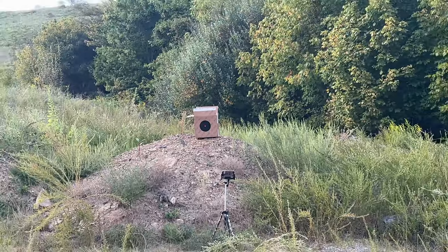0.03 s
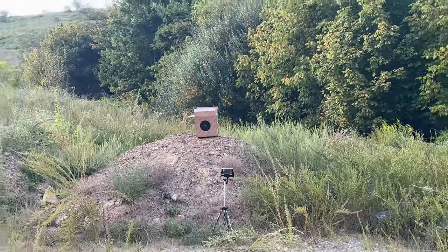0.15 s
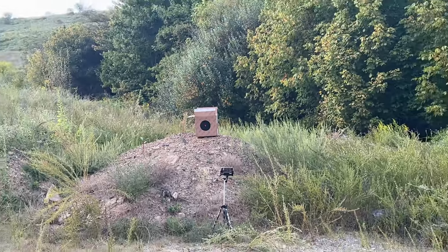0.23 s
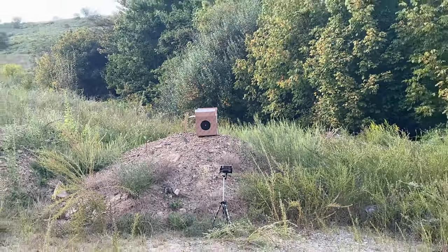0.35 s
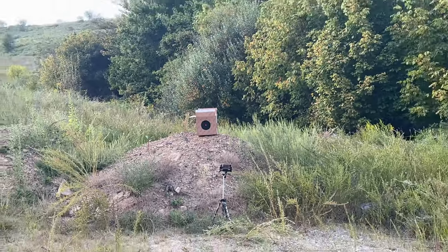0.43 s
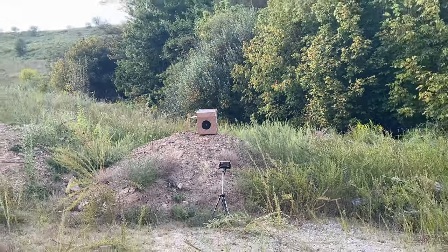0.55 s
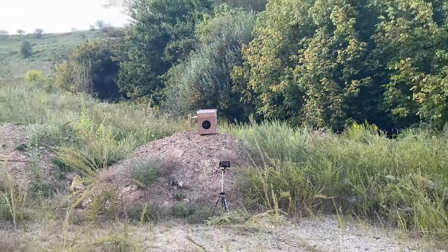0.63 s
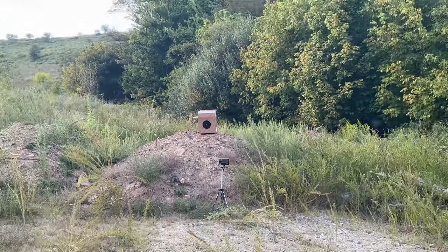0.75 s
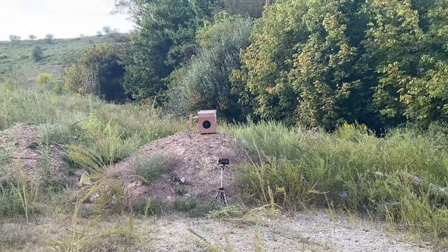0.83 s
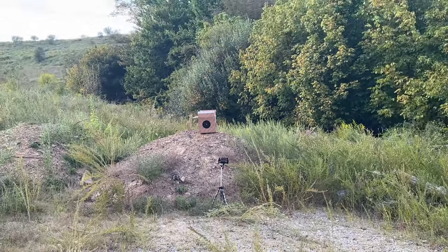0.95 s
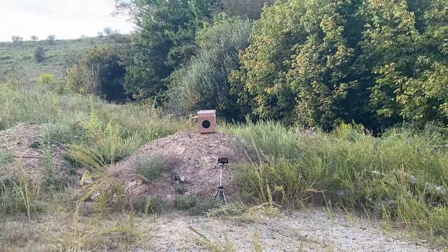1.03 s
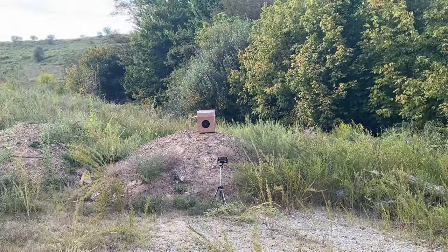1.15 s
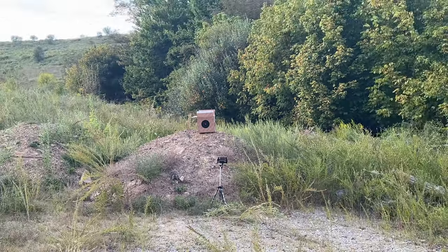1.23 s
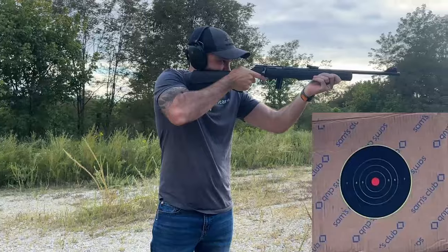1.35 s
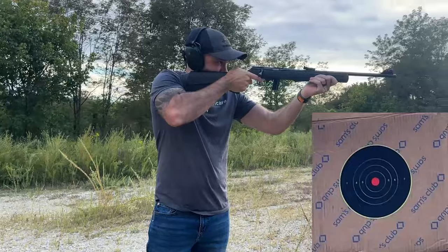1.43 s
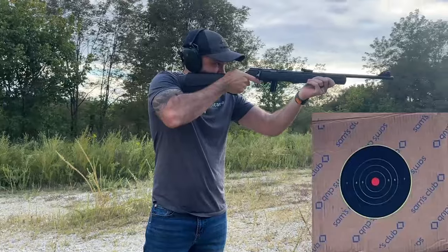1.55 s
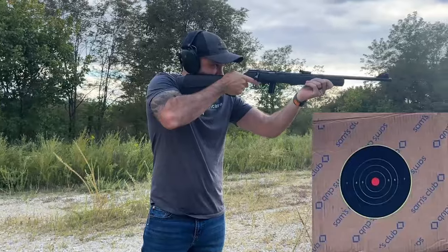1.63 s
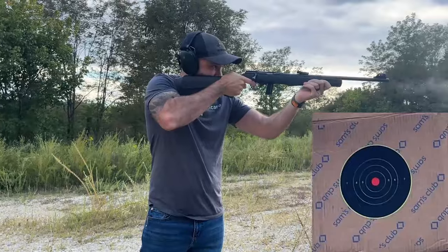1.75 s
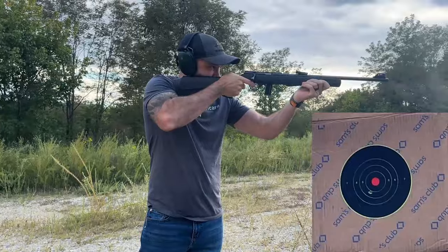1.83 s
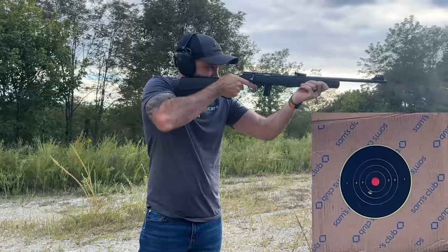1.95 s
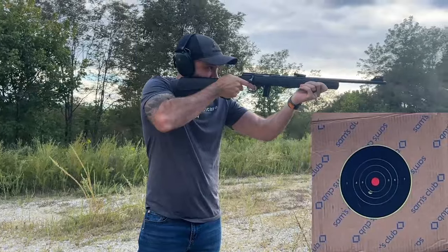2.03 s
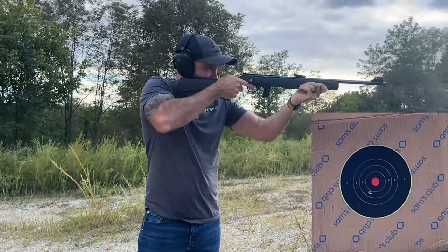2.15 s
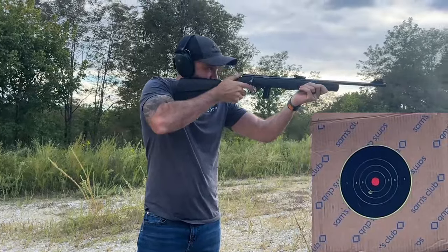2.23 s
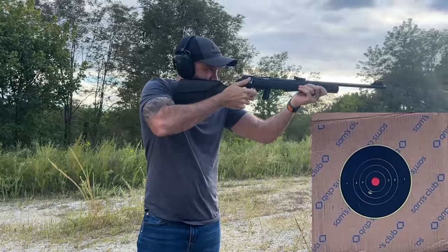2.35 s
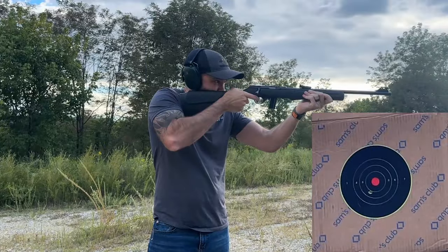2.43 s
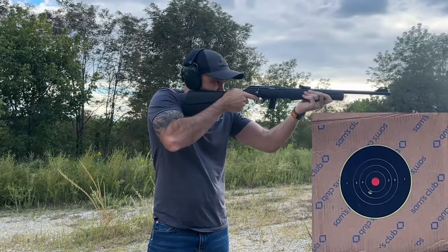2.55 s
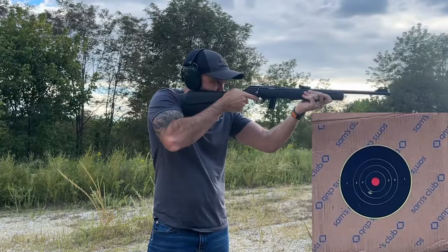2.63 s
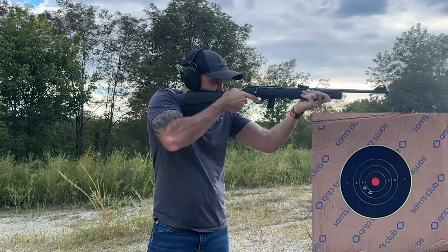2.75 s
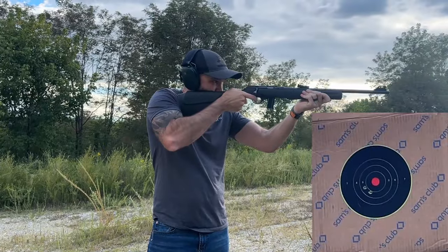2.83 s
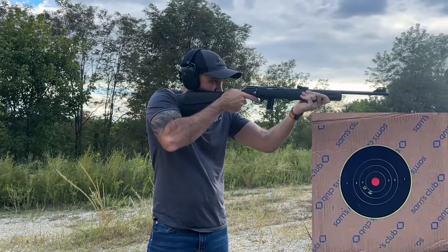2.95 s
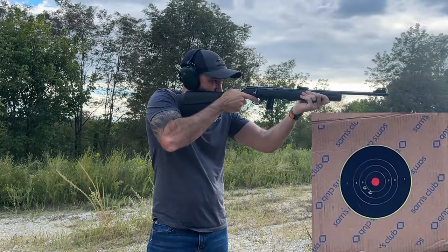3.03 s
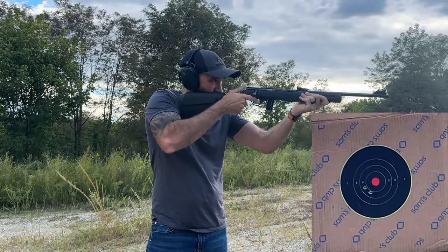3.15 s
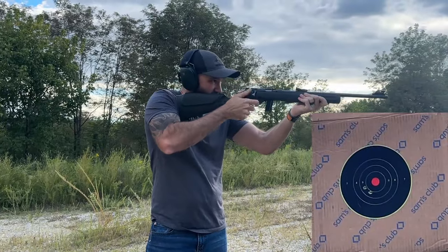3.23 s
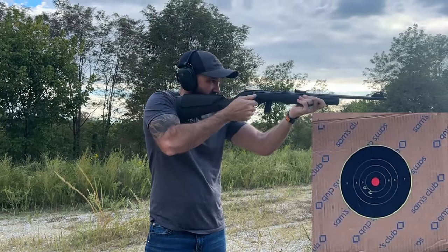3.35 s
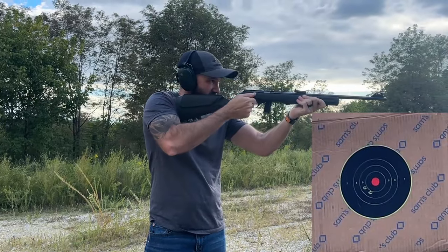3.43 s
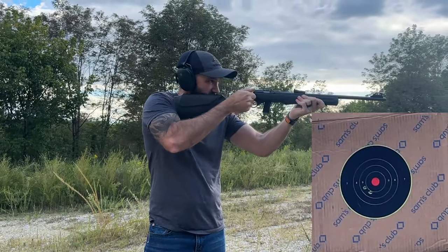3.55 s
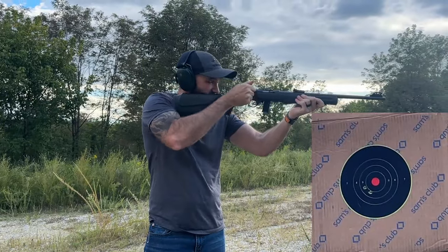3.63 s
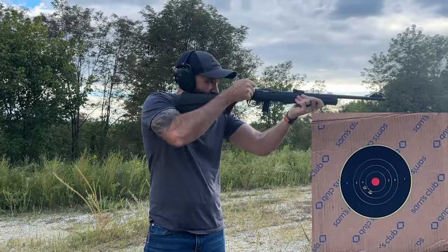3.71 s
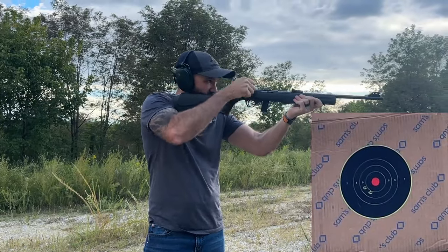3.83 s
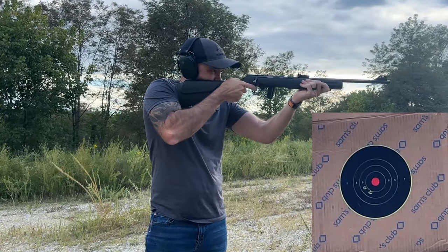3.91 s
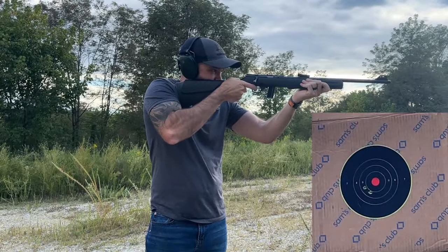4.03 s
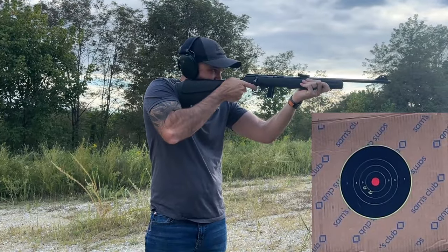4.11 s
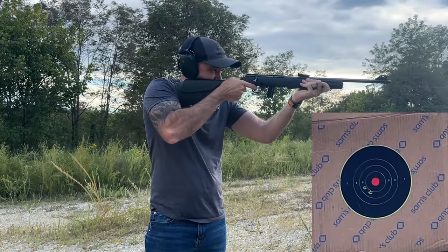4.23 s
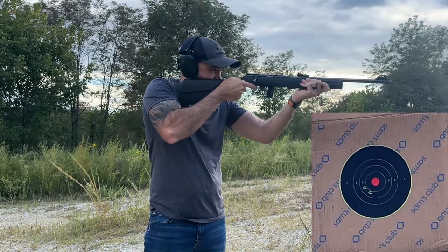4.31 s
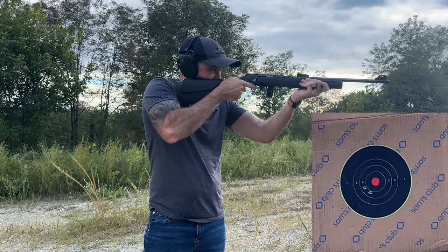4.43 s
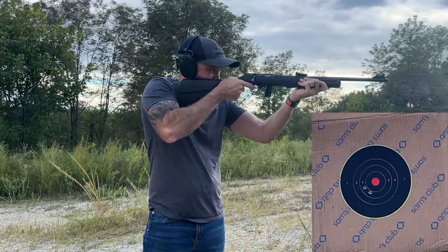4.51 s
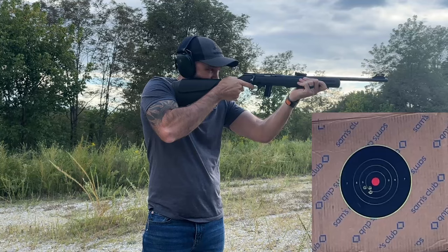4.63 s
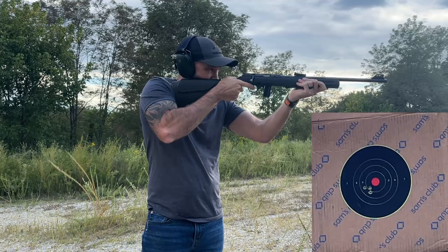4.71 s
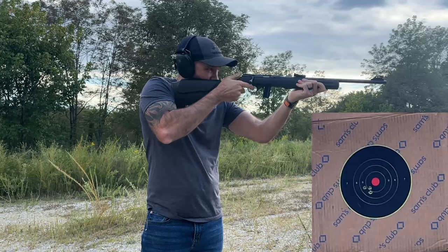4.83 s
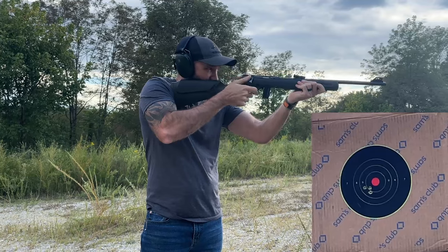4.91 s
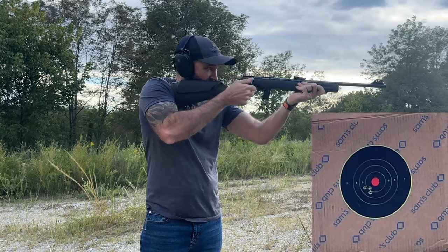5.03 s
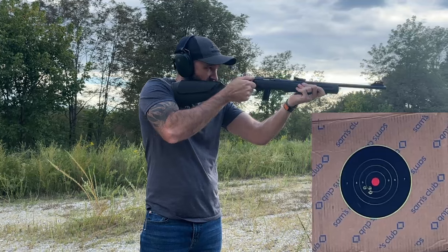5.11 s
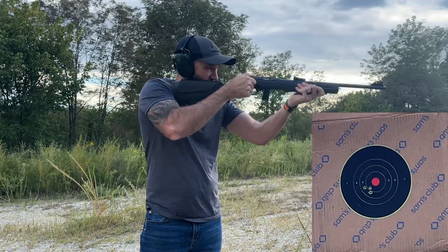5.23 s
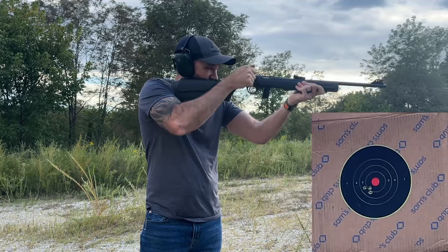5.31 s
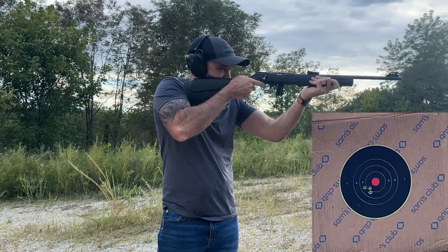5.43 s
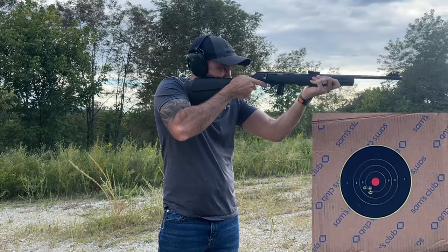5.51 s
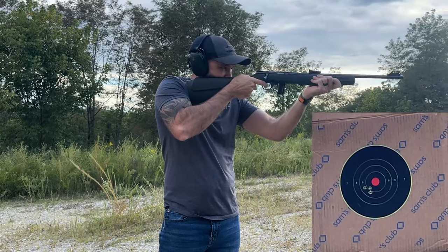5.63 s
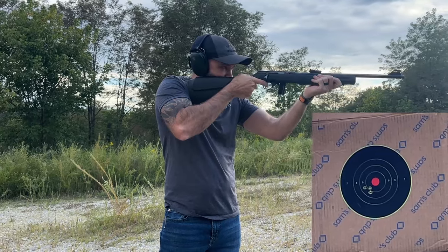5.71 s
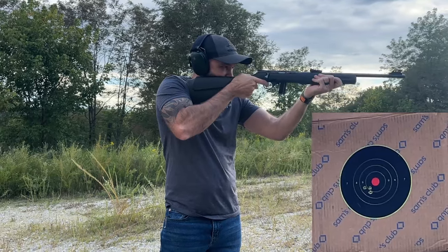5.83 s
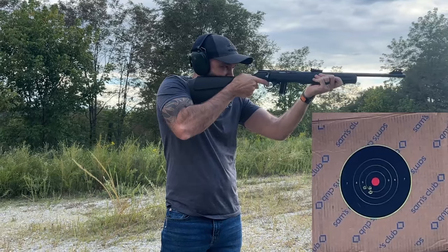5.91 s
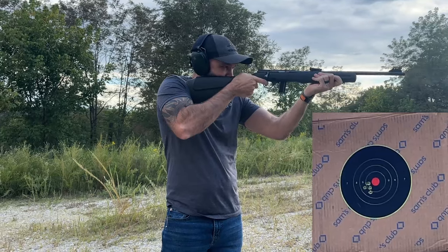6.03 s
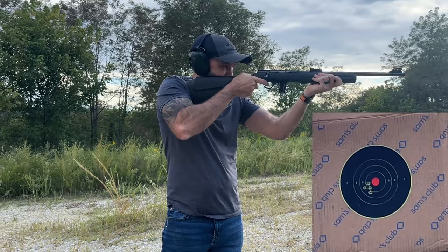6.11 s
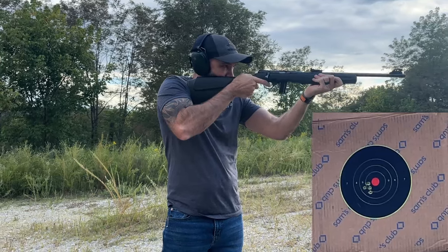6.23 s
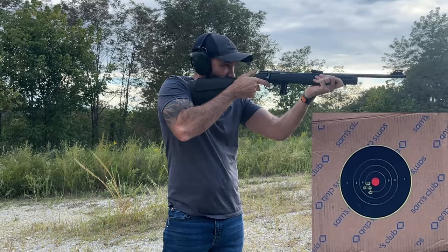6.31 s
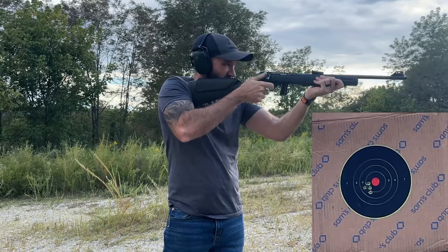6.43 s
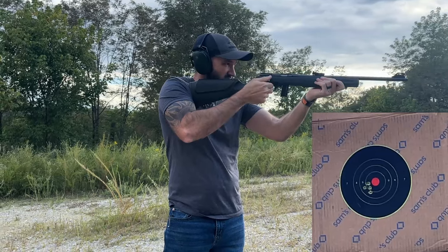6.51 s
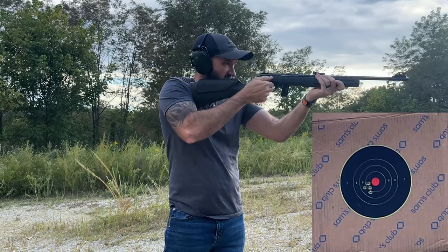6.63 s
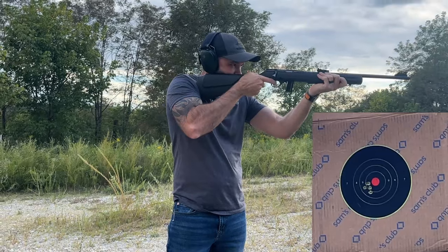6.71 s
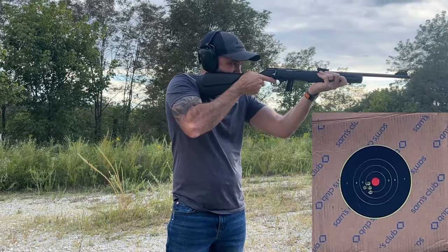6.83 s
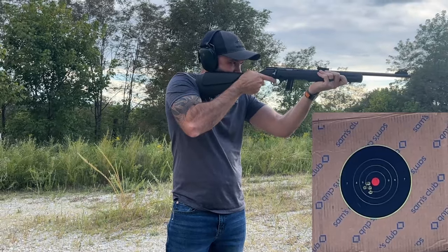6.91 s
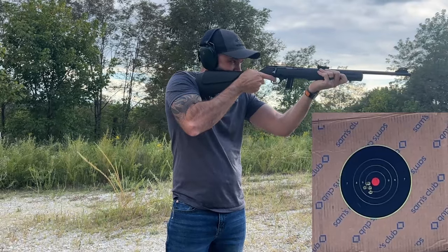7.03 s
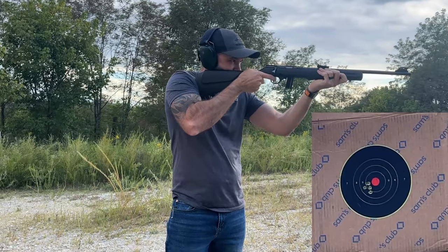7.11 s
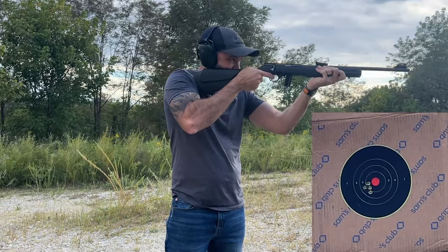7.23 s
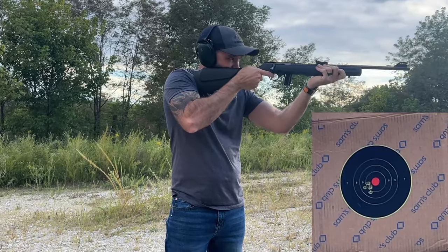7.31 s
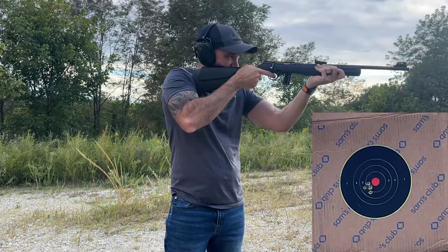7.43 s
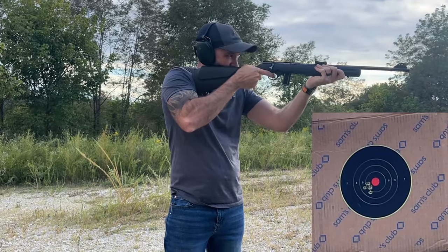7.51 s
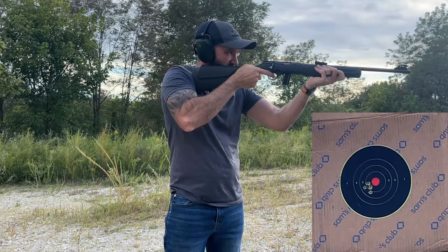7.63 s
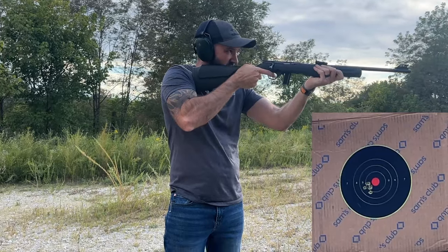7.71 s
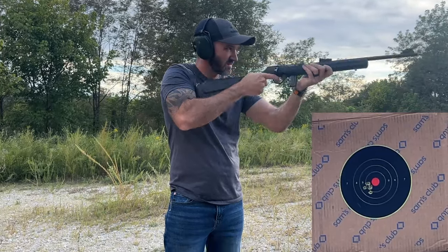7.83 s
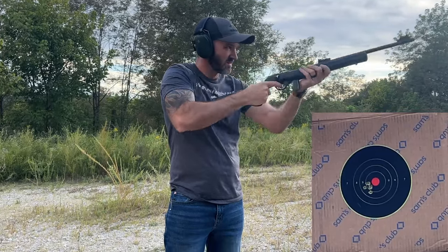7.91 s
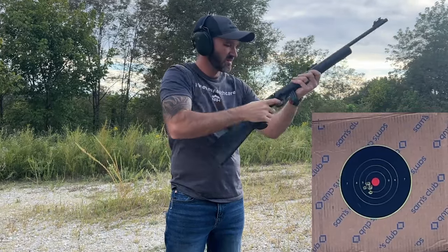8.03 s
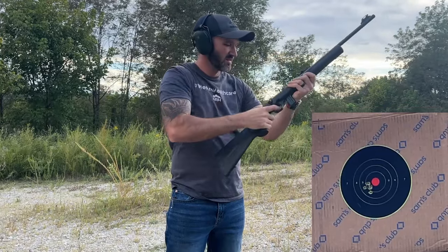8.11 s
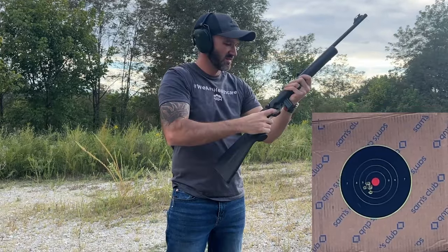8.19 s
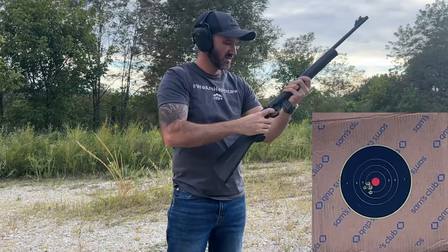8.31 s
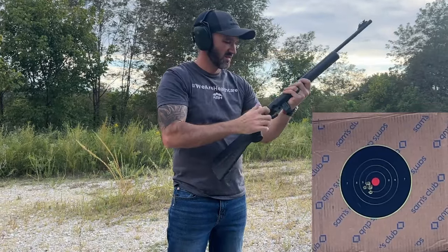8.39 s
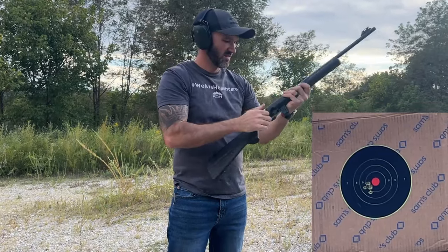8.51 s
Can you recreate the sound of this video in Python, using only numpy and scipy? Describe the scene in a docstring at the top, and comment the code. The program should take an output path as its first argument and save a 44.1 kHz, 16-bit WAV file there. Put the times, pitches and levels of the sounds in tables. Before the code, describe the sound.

A quiet field with thin throbbing cicadas, soft air and low rumble; a faint bolt click. Then five small-rifle shots crack close by, one to two seconds apart, each with a low thump of air on the microphones and a grainy echo from banks and trees fading fast. Short steely bolt clicks fall between some shots. The stereo phone microphones overload softly, and the background shifts abruptly at splices.

```python
"""Cicadas buzz over a low rumble and a bolt clicks; then five small-rifle shots crack in a field, close by.
Each shot is a smear of noise, a sharp front and a noise burst; the same banks and tree lines return it as
duller bursts and fading, grainy noise. Low falling sweeps are puffs of air on a phone's two microphones,
filtered noise is the air they stir, and two close tones beating are a shaking stand. Bolt clicks are short
rattles that ring steel. The waits are spliced short, which stops tails; the background changes in steps."""
import sys
import numpy as np
from scipy import signal
from scipy.fft import rfft, irfft, next_fast_len
from scipy.io import wavfile
from scipy.ndimage import uniform_filter1d

SR = 44100
rng = np.random.default_rng(int(sys.argv[2]) if len(sys.argv) > 2 else 0)


def ratio(d):
    """dB to gain"""
    e = np.asarray(d, float) / 20
    return 10 ** e


def int16_out(signal):
    """Quantize to a 16-bit WAV file."""
    q = np.round(np.clip(np.atleast_2d(signal).T, -1, 1) * 32767)
    wavfile.write(sys.argv[1], SR, q.astype(np.int16))


N = 377527  # length in samples


def evened(x):
    """Scales a sound to rms 1."""
    return x / np.sqrt(np.mean(x ** 2) + 1e-20)


def read(points, hz):
    """Reads a curve of (Hz, value) points along a log frequency axis."""
    f, value = np.transpose(points)
    return np.interp(np.log(hz + 1), np.log(f + 1), value)


def add(mix, s, sound):
    """Mixes a sound in at s seconds."""
    part = mix[..., round(s * SR):][..., :sound.shape[-1]]
    part += sound[..., :part.shape[-1]]


def colour(x, points):
    """Filters by a spectrum of (Hz, dB) points; nothing passes far beyond its ends."""
    size = next_fast_len(x.shape[-1])
    hz = np.fft.rfftfreq(size, 1 / SR)
    inside = (hz > points[0][0] / 2) & (hz < points[-1][0] * 1.03)
    return irfft(rfft(x, size) * ratio(read(points, hz)) * inside, size)[..., :x.shape[-1]]


def bandpass(x, order, low_hz, high_hz):
    """Lets one band of frequencies through."""
    return signal.sosfilt(signal.butter(order, [low_hz, high_hz], "bandpass", fs=SR, output="sos"), x)


def pair(shape, same):
    """Two noise channels; same is how alike they are, 0 for unrelated and 1 for equal."""
    a, b = rng.standard_normal((2, *shape))
    same = np.clip(same, -1, 1)
    return np.array([a, same * a + np.sqrt(1 - same ** 2) * b])


# Colour of the blast. Each row: frequency in Hz, relative level in dB.
BLAST_COLOUR = [(150, -35.5), (400, 10.5), (800, 10.5), (2000, -0.5), (4500, -2.5), (8000, -8),
                (11000, -11.5), (15000, -4.5), (16500, -16)]


def blast():
    """A thin sharp front, then a few ms of cracking gas; 256 samples of silence ahead."""
    t = np.maximum(np.arange(-256, 768) / SR, 0)
    u = t * SR / 2.5  # the front lasts about two samples
    front = 4.0 * (1 - u) * np.exp(-u)
    gas = pair((1024,), 0.35) * u / 12 * np.exp(1 - u / 12)
    sound = colour((front + gas) * (t > 0), BLAST_COLOUR)
    energy = (sound ** 2).sum(1).mean()
    return sound / np.sqrt(energy / (0.0048 * SR))  # rms 1 if packed into 4.8 ms


# What scatters the shot back, nearest first.
# Each row: delay in seconds, relative level in dB, swell before it in dB per s, fade after it in dB per s.
REFLECTORS = [(0.001, -17.5, 895, 844.5), (0.04, -14, 494, 904), (0.102, -22, 350, 211),
              (.15, -34.5, 100, 77), (.3, -24, 112.5, 65.5), (.55, -39, 59.5, 25.5)]
# Colour of the returning sound. Each row: frequency in Hz, relative level in dB.
RETURN_COLOUR = [(200, -40.5), (450, -6), (1000, 3), (2000, -0.5), (3000, -1.5), (5000, -5.5), (8000, -15),
                 (11000, -16.5), (15500, -23.5)]
# Further loss with distance. Each row: frequency in Hz, loss in dB per s of delay.
DISTANCE_LOSS = [(300, 44), (600, 26.5), (1000, 1.5), (1800, -1.5), (3500, 9), (6000, 24.5), (10000, 30),
                 (15000, 56.5)]


def scatter(seconds, tilt_db):
    """Countless returns from grass and trees: grainy noise, changing colour with distance, a swell each reflector."""
    hz = np.fft.rfftfreq(256, 1 / SR)
    frames = int(seconds * SR / 64) + 4
    t = np.arange(frames)[:, None] * 64 / SR
    grains = pair((frames, 129), 0.49) + 1j * pair((frames, 129), 0.48)

    # random level spread: ripples across frequency, and slower lumps across time and frequency
    ripples = uniform_filter1d(rng.standard_normal((frames, 129)), size=20, axis=1)
    ripples_db = 2.6 * evened(ripples) * np.exp(-t / 3.3)
    lumps = uniform_filter1d(rng.standard_normal((frames, 129)), size=14, axis=0)
    lumps_db = 1.6 * evened(uniform_filter1d(lumps, size=8, axis=1))

    shape_db = read(RETURN_COLOUR, hz) + tilt_db * np.log2((hz + 1) / 2000)  # tilt in dB per octave
    level_db = shape_db - t * read(DISTANCE_LOSS, hz) + ripples_db + lumps_db
    grains *= ratio(level_db) * (hz < 16200) / np.sqrt(np.mean(ratio(2 * shape_db)))
    sound = signal.istft(grains.transpose(0, 2, 1), nperseg=256, noverlap=192)[1]
    sound = sound[:, :round(seconds * SR)] / 10

    t = np.arange(sound.shape[1]) / SR
    power = 0
    for s, db, swell, fade in REFLECTORS:
        power = power + ratio(2 * (db - np.maximum(swell * (s - t), fade * (t - s))))
    return sound * np.sqrt(power)


SMEAR_S = 0.019  # length of the smear


def smear(hz):
    """A short smear of noise around hz that swells, and a dull low body under it, alike in both channels."""
    u = np.linspace(0, 1, round(SMEAR_S * SR))
    swell = np.sin(np.pi * .8 * u ** 1.8) ** 2
    hiss = bandpass(pair(u.shape, 0.4), 1, hz / 2, hz * 2)
    hiss = signal.sosfilt(signal.butter(4, 7000, fs=SR, output="sos"), hiss)
    dull_body = 900 / hz * evened(bandpass(rng.standard_normal(u.shape), 2, 380, 850))
    return swell * evened(hiss), swell * dull_body


# The shots. Each row: time in seconds, blast level in dB, level of its scattered echo in dB,
# level of the smear of noise just ahead of it in dB, centre of the smear's colour in Hz
# (a higher one also brightens the echo).
SHOTS = [(1.7487, -18.5, -8, -18.5, 900), (2.7288, -15, -12, -18.5, 616), (4.4882, -12, -8, -18, 1000),
         (5.965, -15.5, -15.5, -22.5, 2500), (7.2184, -15.5, -7, -20, 1100)]
# The blast and its near returns. Each row: delay in seconds, level against the blast in dB, dullness 0-1.
NEAR_RETURNS = [(0, 0, 0.17), (.0048, -10, .6), (0.0395, 4, .55), (0.0448, -11, 0.5)]
# Single trunks of the two tree lines: a list of delays in seconds.
TRUNKS = [.09, .1, .108, .126, .135, .148, .18, .2254, .2485, .2596, .2686, .28, .2914, .32, .3557]
# Where the background changes level, at a splice or otherwise: a list of times in seconds.
BACKGROUND_STEPS = [0, .36, 1.305, 2.43, 3.91, 4.6, 5.47, 6.748, 7.9]
TILT_DB, TILT_DB_PER_OCTAVE = 1.48, 1.04  # echo tilt in dB per octave; its growth per octave of smear colour
TRUNK_DB, TRUNK_SPREAD_DB = -17, 2.5  # level of a trunk's return against the scatter; its random spread
TRUNK_DB_PER_S, TRUNK_DULL = -18, 0.98  # level change with delay; dullness 0-1
LEFT_LAG = 19  # samples; the sound reaches the right microphone first


def shots():
    """The blast with a smear of noise just ahead, single echoes, and a scattered tail that is cut off."""
    out, body = np.zeros((2, N)), np.zeros(N)
    for s, db, scatter_db, smear_db, hz in SHOTS:
        # the tail stops at a step over half a second later, never the last step, or else at the end
        cut = min([c for c in BACKGROUND_STEPS[:-1] if c > s + .5] + [N / SR])
        tilt_db = TILT_DB + TILT_DB_PER_OCTAVE * np.log2(hz / 1000)
        add(out, s, ratio(scatter_db) * scatter(cut - s, tilt_db))

        returns = [(delay, db + echo_db, dull) for delay, echo_db, dull in NEAR_RETURNS]
        for delay in TRUNKS:
            spread_db = TRUNK_SPREAD_DB * rng.standard_normal()
            trunk_db = scatter_db + TRUNK_DB + TRUNK_DB_PER_S * delay + spread_db
            returns.append((delay, trunk_db, TRUNK_DULL))
        for delay, return_db, dull in returns:
            crack = blast()
            crack = crack + np.clip(dull, 0, 1) * (bandpass(crack, 2, 1050, 3300) - crack)
            add(out, s + delay - 256 / SR, ratio(return_db) * crack)

        hiss, dull_body = smear(hz)
        add(out, s - SMEAR_S, ratio(smear_db) * hiss)
        add(body, s - SMEAR_S, ratio(smear_db) * dull_body)
    out[0] = np.roll(out[0], LEFT_LAG)
    return out + body


# Puffs of air on the microphones.
# Each row: start in seconds, level in dB, seconds to the peak, relative level of the mid-range knock in dB.
PUFFS = [(1.751, -12, 0.018, -28), (1.787, -14.5, 0.019, -36), (1.863, -24.5, 0.027, -72.5),
         (1.947, -26.5, 0.02, -53.5), (2.013, -19.5, .018, -36.5), (2.043, -23.5, 0.015, -46),
         (2.11, -35, 0.026, -89), (2.713, -13.5, 0.032, -25.5), (2.728, -11.5, 0.013, -41),
         (2.765, -14.5, 0.013, -43.5), (2.791, -17, 0.031, -44.5), (2.878, -28, 0.024, -55.5),
         (4.483, -12.5, 0.018, -30), (4.524, -9.5, 0.015, -29), (4.651, -32.5, 0.016, -55),
         (5.947, -17, 0.036, -52), (5.965, -10.5, 0.017, -52), (6.06, -32.5, 0.035, -71),
         (6.106, -22.5, 0.018, -46), (7.222, -8, 0.019, -33.5), (7.263, -32.5, 0.0085, -41.5),
         (7.284, -21, 0.023, -72), (7.419, -21.5, 0.017, -48)]
SWEEP_HZ, SHARP_S = 167.5, .016  # height of the sweep for a puff peaking after SHARP_S; slower puffs sweep less


def thumps():
    """Each puff leaves the steep bass filter as a falling sweep, led by a short knock; it meets the ports unevenly."""
    out, t = np.zeros((2, N)), np.arange(round(.2 * SR)) / SR
    for (s, db, rise, knock_db), skew in zip(PUFFS, rng.choice([-1., 1.], len(PUFFS))):
        sweep_hz = SWEEP_HZ * (SHARP_S / rise) ** 0.66
        turns = 47 * t + sweep_hz * .013 * (1 - np.exp(-t / .013))  # falls towards 47 Hz
        uneven = skew * np.array([[1], [-1]]) * 0.38 * np.exp(-25 * t)  # phase in radians
        puff = (t / rise * np.exp(1 - t / rise)) ** 2
        add(out, s, ratio(db) * puff * np.cos(2 * np.pi * turns + 0.52 + uneven))
        tap = (t / 0.0037 * np.exp(1 - t / 0.0059)) ** 2
        knock = np.sin(2 * np.pi * (420 * t - 4000 * t ** 2) + uneven)  # falls from 420 Hz
        add(out, s, ratio(knock_db) * tap * knock)
    return out


# Stirred air after a shot. Each row: frequency in Hz, relative level in dB.
BUFFET_COLOUR = [(45, -11.5), (70, -0.5), (110, -3), (160, -11.5), (210, -31.5)]
BUFFET_DB, BUFFET_DB_PER_S = -35, 94  # level at the start, fade


def buffet():
    """The air round the microphones rumbles unevenly for a moment after each shot."""
    out, t = np.zeros((2, N)), np.arange(round(.6 * SR)) / SR
    for s, *_ in SHOTS:
        fade = ratio(BUFFET_DB - BUFFET_DB_PER_S * t) * np.minimum(t / .01, 1)
        add(out, s, fade * evened(colour(pair(t.shape, 0.59), BUFFET_COLOUR)))
    return out


# The stand keeps swaying.
# Each row: start in seconds, level in dB before the beat, middle pitch in Hz, seconds between lulls, fade in dB per s.
STAND_SWINGS = [(1.82, -24.5, 54.45, 0.18, 73.5), (2.77, -27, 46.2, 0.17, 72), (5.96, -23, 49.2, .195, 60),
                (7.281, -19.5, 48.86, .197, 85.5)]
SWAY_BEAT, SWAY_S = 0.56, 1  # depth of the beating 0-1, length in seconds


def sway():
    """A low near-sine that dies in steps, as two close swings of the stand beat."""
    out, t = np.zeros(N), np.arange(round(SWAY_S * SR)) / SR
    ends = signal.windows.tukey(len(t), .05)  # soft start and end
    for s, db, hz, lull_s, fade in STAND_SWINGS:
        upper = np.cos(2 * np.pi * (hz + 1 / (2 * lull_s)) * t)
        lower = np.cos(2 * np.pi * (hz - 1 / (2 * lull_s)) * t)
        add(out, s, ratio(db - fade * t) * (upper - SWAY_BEAT * lower) * ends)
    return out


# Blows of the bolt. Each row: time in seconds, peak level of the body in dB, treble over body in dB,
# left over right in dB, pitch of the ring as a factor on the modes.
BOLT_CLICKS = [(0.643, -43, -30, 7, 1.5), (0.822, -57, -16, -2, 0.74), (3.283, -46.5, -27, 7, 1.6),
               (3.484, -54.5, -2.5, 5, .99), (3.668, -23, -6.5, 0.2, 1.13), (5.131, -34.5, -4, 3, 1.2),
               (5.324, -21, -9.5, -1.5, 1.046), (6.682, -45.5, -1.5, 0.5, 1.5), (6.949, -61, -27, 0, 0.84),
               (7.109, -64, -18.5, 14, 1.07), (7.142, -54.5, -30, 13, 1.03), (8.101, -57, -21, 5, 1.3)]
# Ringing modes of the steel. Each row: frequency in Hz at pitch 1, relative level in dB, seconds to fade by 60 dB.
STEEL_MODES = [(430, -40.5, 0.0105), (970, -15.5, 0.0095), (1527, 8, 0.025), (2000, 1, 0.0088),
               (2645, 10.5, 0.023), (4330, -2.5, 0.022), (4870, 12.5, 0.004)]
# Dry blow on the stock. Each row: frequency in Hz at pitch 1, relative level in dB.
CLACK_COLOUR = [(250, -35), (450, 11), (1200, -2.5), (3000, -7), (6000, -10.5), (9000, -28)]
CLACK_DB = -0.5  # level of the dry blow against the ring
RATTLE_S, RATTLE_SHARE = .0028, .35  # decay time for a -22 dB blow; share of the dB above or below that it follows


def bolt():
    """Steel parts meet in a quick rattle of ticks that briefly rings the action."""
    out, t = np.zeros((2, N)), np.arange(1300) / SR
    contact = 12  # samples
    for s, db, treble_db, pan_db, pitch in BOLT_CLICKS:
        # each mode is detuned at random, up to 4 percent, for every click
        factors = pitch * rng.uniform(0.96, 1.04, len(STEEL_MODES))
        ring = np.zeros(len(t))
        for (hz, level_db, t60), factor in zip(STEEL_MODES, factors):
            ring += ratio(level_db - 60 * t / t60) * np.sin(2 * np.pi * hz * factor * t)
        ring[:contact] += 13.0 * np.gradient(signal.windows.hann(contact))  # the blow itself

        decay_s = RATTLE_S * ratio(RATTLE_SHARE * (db + 22))
        rattle = pair(t.shape, 0.87) ** 3 * t ** 1.4 * np.exp(-t / decay_s)
        body = signal.fftconvolve(rattle, ring[None], axes=1)[:, :len(t)]
        # small parts clack much higher
        clack = colour(rattle, [(hz * pitch ** 3, level_db) for hz, level_db in CLACK_COLOUR])
        body += ratio(CLACK_DB) * clack * np.linalg.norm(body) / np.linalg.norm(clack)
        ticks = bandpass(rattle, 4, 8000, 16000)
        treble = ratio(treble_db) * ticks * np.linalg.norm(body) / np.linalg.norm(ticks)
        click = (body + treble) / abs(body).max()
        sides_db = np.array([[.5], [-.5]]) * pan_db
        add(out, s - .002, ratio(db + sides_db) * click)
    return out


# Background levels, one row for each stretch between the times in BACKGROUND_STEPS. Each row: rumble in dB,
# 90 Hz hum in dB, cicadas in dB before they throb, rustle in dB before its gusts, high insects in dB.
STRETCHES = [(-65.5, -85, -72.5, -85, -72.5), (-65.5, -76, -73, -78, -74), (-70, -76, -67, -100, -78.5),
             (-73.5, -74.5, -70, -94, -100), (-65, -62, -67.5, -100, -100), (-70, -70, -67.5, -83.5, -100),
             (-69.5, -81.5, -70, -100, -100), (-70, -95, -69.5, -100, -100), (-71.5, -80, -71, -102, -100)]
# Colours of the six layers. Each row of each: frequency in Hz, relative level in dB.
RUMBLE_COLOUR = [(22, -52.5), (35, -20), (50, -4.5), (75, 5.5), (120, -4), (170, -10.5), (230, -29),
                 (300, -31.5)]
HUM_COLOUR = [(75, -21.5), (90, -3.5), (105, -24.5)]
CICADA_COLOUR = [(3400, -33), (3650, -4), (3800, -8), (3950, -3), (4250, -31)]
AIR_COLOUR = [(200, -7), (500, -5), (1000, -5), (2200, -26.5), (4800, -6.5), (5600, -2.5), (6300, 0),
              (7700, 1), (8600, -8), (9200, -27.5), (11500, -37), (14500, -6.5), (16000, -12)]
RUSTLE_COLOUR = [(900, -11), (1300, -5.5), (1900, -7.5), (2800, -14.5), (3300, -22)]
HIGH_INSECT_COLOUR = [(5180, -31.5), (8800, -9.5), (9820, 9), (10700, -4), (12100, -8.5), (13200, 2),
                      (15200, -19.5), (16000, -13)]
AIR_DB = -70  # steady level of the soft air
THROB_HZ, THROB_DEPTH = 68.2, .5  # pulsing of the cicadas: mean rate, depth 0-1


def meadow():
    """Filtered noise: rumble with a faint hum, soft air, uneven rustle, throbbing cicadas and higher insects."""
    t = np.arange(N) / SR
    stretch = np.searchsorted(BACKGROUND_STEPS, t, "right") - 1
    gains = ratio(np.array(STRETCHES, float)).T
    rumble, hum, cicadas, rustle, high = (gain[stretch] for gain in gains)
    # slow random curves: one shifts the throb, one moves the rustle by about 1 dB
    wander, gusts_db = (evened(colour(rng.standard_normal(N), [(1, 0), (hz, -10)])) for hz in (4, 12))
    throb = 1 + THROB_DEPTH * np.cos(2 * np.pi * THROB_HZ * t + 1.3 * wander)
    # gain, colour, likeness of the two channels
    layers = [(rumble, RUMBLE_COLOUR, .87),
              (hum, HUM_COLOUR, .9),
              (cicadas * throb, CICADA_COLOUR, .5),
              (ratio(AIR_DB), AIR_COLOUR, .1),
              (rustle * ratio(gusts_db), RUSTLE_COLOUR, .1),
              (high, HIGH_INSECT_COLOUR, .3)]
    return sum(gain * evened(colour(pair((N,), same), shape)) for gain, shape, same in layers)


def scene():
    """Adds all sources, from the shots to the meadow."""
    return shots() + thumps() + buffet() + sway() + bolt() + meadow()


def low_pass(x):
    """Removes everything above the highest recorded frequency."""
    return signal.sosfilt(signal.butter(12, 17160, fs=SR, output="sos"), x)


# Dips of the microphone housing. Each row: frequency in Hz, width in Hz, depth in dB.
HOUSING_DIPS = [(217, 15, -19.5), (6864, 520, -23.5)]
OVERLOAD = 1.1  # level that the microphone's soft overload approaches


def record(dry):
    """The microphones overload softly and hiss faintly, and their housing dips two bands."""
    size = next_fast_len(N)
    hz = np.fft.rfftfreq(size, 1 / SR)
    dips_db = sum(db / (1 + (2 * (hz - f) / width) ** 2) for f, width, db in HOUSING_DIPS)
    squeezed = OVERLOAD * np.tanh(dry / OVERLOAD)
    hissing = squeezed + ratio(-110) * rng.standard_normal(dry.shape)
    mix = irfft(rfft(hissing, size) * ratio(dips_db), size)[:, :N]
    return low_pass(mix)


dry = scene()
out = record(dry)
int16_out(out)
```